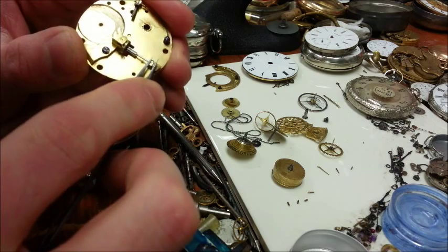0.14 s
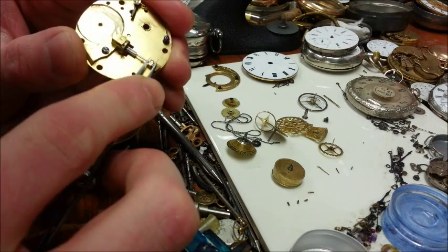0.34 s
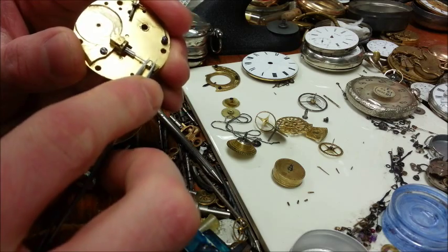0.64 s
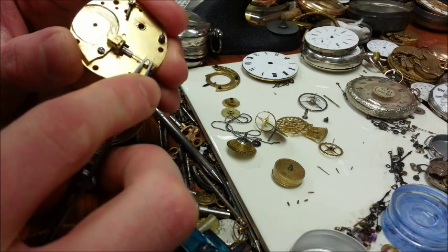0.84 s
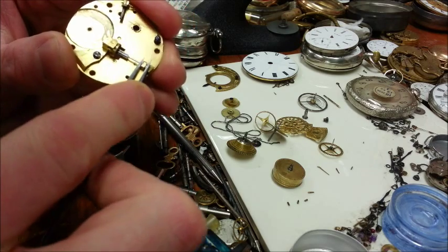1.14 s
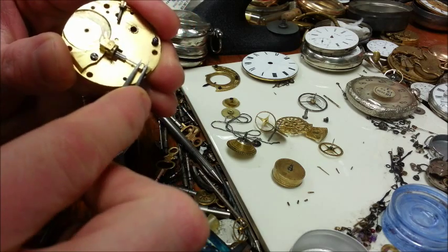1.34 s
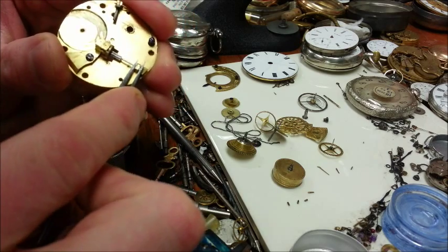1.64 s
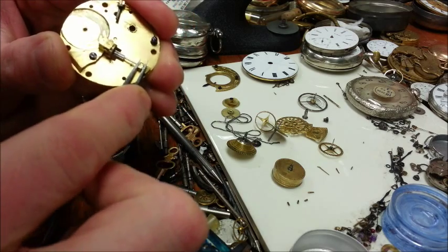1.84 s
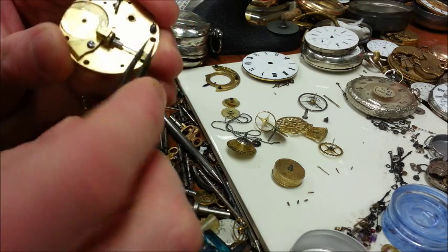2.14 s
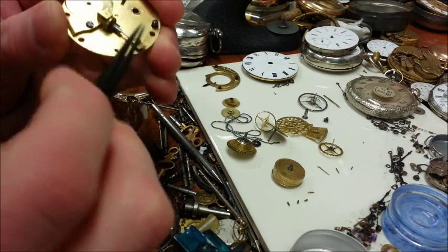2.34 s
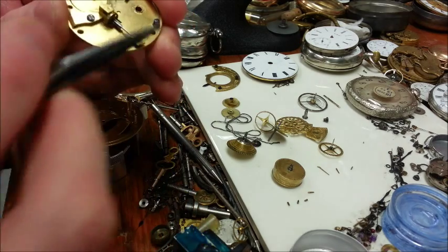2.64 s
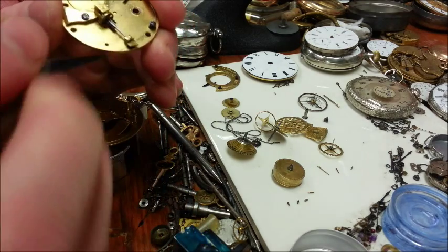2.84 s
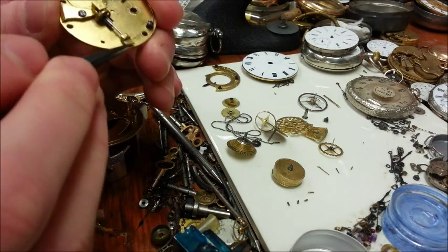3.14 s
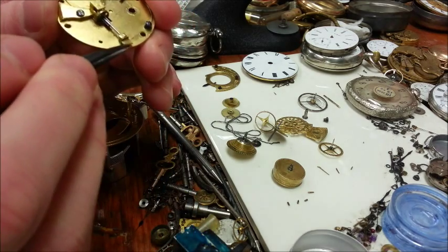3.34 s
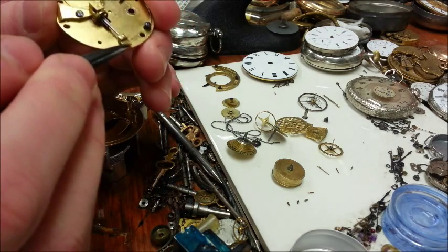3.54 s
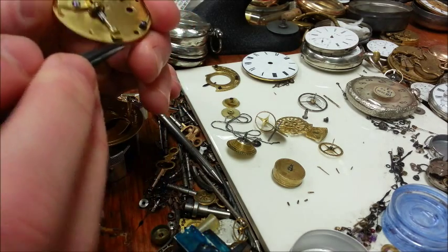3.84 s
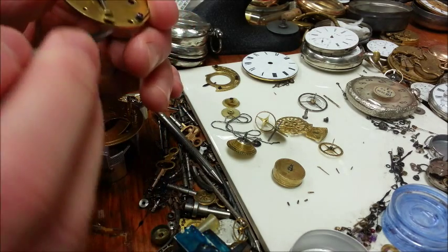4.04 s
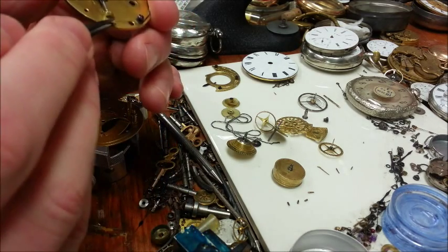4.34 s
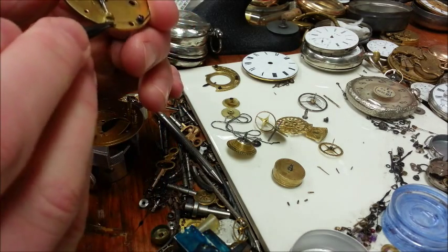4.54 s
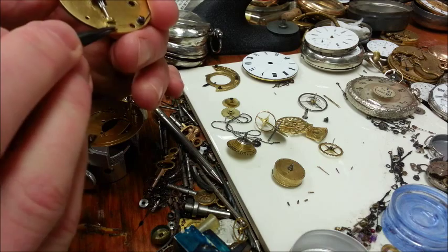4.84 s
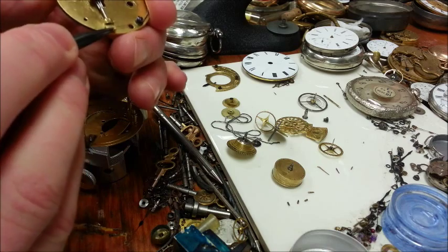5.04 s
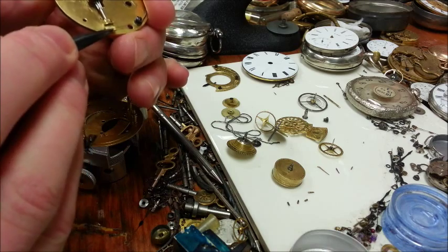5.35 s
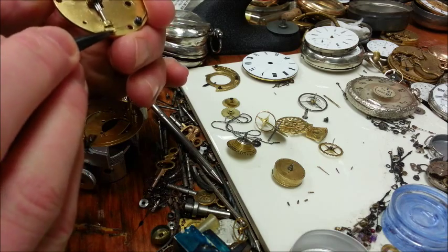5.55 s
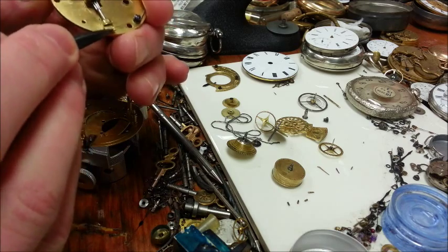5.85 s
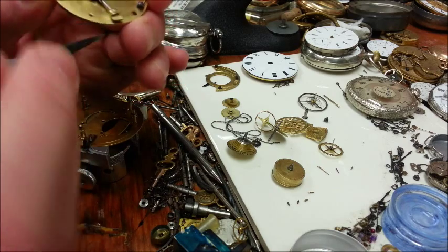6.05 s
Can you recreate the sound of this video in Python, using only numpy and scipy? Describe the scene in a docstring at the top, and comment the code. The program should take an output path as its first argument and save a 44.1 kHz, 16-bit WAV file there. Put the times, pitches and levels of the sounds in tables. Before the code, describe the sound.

A watch ticks faintly throughout, five times a second, with weak and strong beats alternating. Beneath it lie a steady low hum and rumble, slight hiss and a barely audible high whine. Close by on the right, steel tweezers tap a small brass watch movement at about 0.5 seconds, and give a quick cluster of lighter taps just after 2 seconds. From 2.6 to 3.3 seconds the tool knocks and rubs softly in the fingers. Tiny scratches and pinging taps follow between 3.7 and 4.4 seconds, ending in a duller, hollow knock and rub. At 5.2 seconds the tips slip off a part and snap shut with a sharp, briefly ringing click, by far the loudest sound. A second, softer snap comes at about 6 seconds. The small room adds only a very short echo to each click.

```python
"""Tweezers on a ticking watch

Steel tweezers work on a small brass watch movement, close by on the right. The tips tap, scratch
and twice snap off a part, making the metal ring. The tool knocks and rubs in the fingers, and a
watch ticks five times a second. A small room answers each click, over low hum, a thin whine and hiss."""
import sys
import numpy as np
from scipy import signal
from scipy.fft import rfft, irfft
from scipy.io import wavfile
from scipy.ndimage import uniform_filter1d

SR = 44100
rng = np.random.default_rng(int(sys.argv[2]) if len(sys.argv) > 2 else 0)


def master(y):
    """Save y as 16-bit WAV."""
    cut = np.clip(np.atleast_2d(y).T, -1, 1)
    pcm = np.round(cut * 32767)  # scale
    wavfile.write(sys.argv[1], SR, pcm.astype(np.int16))


N = 272538
T = np.arange(N) / SR

# The tips snap off a part:
# start_s, level_db, pitch_ratio, ring_time_ratio, slip_s, hollow_db, zing_db, low_tones_db, hiss_db
# hollow_db, zing_db and hiss_db are relative to level_db; low_tones_db softens the steel's lower tones.
SNAPS = [(5.2157, 5.8, 1.0, 1, .0016, -18.5, -20, 0, -24),
         (6.0638, -9.5, .967, 1.55, .003, -21, -8, -5.5, -18)]
# Tones of the hollow of the hand: pitch_hz, level_db, ring_s (time to fade by 60 dB)
HAND_TONES = [(1250, -9, .007), (1540, -7, .007), (1990, 0, .009), (2330, -5, .006)]
# The fine crack of small steel points: pitch_hz, level_db
FINE_CRACK = [(1000, -9), (2500, -8), (3800, -5.5), (5800, 0), (8000, 1.5), (11000, .5), (14500, -4.5),
              (16000, -30)]


def snaps():
    """The springy tips slip off and clap shut, ringing the steel; a tight grip mutes its low tones."""
    # Tones of the tweezers, and the zing of their very points: pitch_hz, level_db, ring_s
    steel_tones = [(3400, -24, .003), (4760, -16, .012), (5185, -2, .013), (5950, -15, .008),
                   (6750, -2.5, .007), (7790, -0.5, .0125), (8400, -17, .005), (10920, -9, .010),
                   (12100, -21, .005), (13600, -13, .008)]
    zing_tones = [(14380, 0, .018)]
    # The bare crack of hard contact: pitch_hz, level_db
    hard_crack = [(500, -27), (1200, -10), (2500, -1), (4000, 0), (7000, 6), (9000, 0), (14500, -5)]
    # Echoes from nearby surfaces: delay_s, level_db
    echoes = [(.0105, -26), (.028, -29)]
    out, low_below_hz = np.zeros(N), 5500
    for start_s, db, pitch, sustain, slip_s, hollow_db, zing_db, low_db, _ in SNAPS:
        tones = [(hz, level + low_db * (hz < low_below_hz), ring_s) for hz, level, ring_s in steel_tones]
        clap = blow(ring(tones, pitch, sustain), slip_s, chatter=.2, crack_db=-14, tone=hard_crack)
        add(out, start_s, undb(db + zing_db) * ring(zing_tones))
        add(out, start_s, undb(db) * clap)
        add(out, start_s, undb(db + hollow_db) * unit(ring(HAND_TONES) + .5 * thud()))
        for delay_s, echo_db in echoes:
            add(out, start_s + delay_s, undb(db + echo_db) * clap)
    return out


def tips():
    """Light touches rattle on the brass, ping and thud into the fingers; scratches make the brass sing."""
    # Tones of the brass movement: pitch_hz, level_db, ring_s
    brass_tones = [(4200, -16, .018), (5400, -20, .005), (6870, 0, .009), (7700, -12, .004),
                   (8600, -16, .004), (10400, -6, .005), (11150, -8, .004), (13400, -14, .004),
                   (14300, -17, .004)]
    # Each tap pings at two pitches, set by where it lands:
    # start_s, rattle_db, contact_s, low_hz, low_db, high_hz, high_db, thud_db
    taps = [(0.469, -15.5, .0052, 4400, -33, 7800, -22, -31),
            (0.4712, -21, .0038, 5500, -30, 10900, -29, -37),
            (2.151, -25, .0017, 6100, -27.5, 8600, -27, -43),
            (2.166, -24, .0025, 5900, -25.5, 7250, -23.5, -40),
            (2.1681, -28, .003, 4300, -33, 13200, -27, -45),
            (3.7295, -26, .003, 4200, -25, 10400, -26, -38), (3.958, -35, .001, 4350, -38, 7000, -36, -45),
            (4.131, -39, .001, 6100, -43, 7100, -41, -50), (4.357, -28, .0044, 4450, -38, 7900, -34, -45)]
    # The tips scrape along the brass: middle_s, length_s, level_db
    scratches = [(2.144, .041, -66), (3.672, .01, -61), (3.686, .013, -41), (3.704, .022, -57.5),
                 (3.723, .018, -43.5), (3.883, .025, -61.5), (3.957, .026, -59.5)]
    out = np.zeros(N)
    touched = ring(brass_tones, pitch=1.15, sustain=.25, flip=True)
    for start_s, db, contact_s, low_hz, low_db, high_hz, high_db, thud_db in taps:
        rattle = blow(touched, contact_s, chatter=1.4, crack_db=3, tone=FINE_CRACK)
        add(out, start_s, undb(db) * rattle)
        add(out, start_s, undb(thud_db) * thud())
        for hz, ping_db in (low_hz, low_db), (high_hz, high_db):
            add(out, start_s + contact_s / 4, undb(ping_db) * ring([(hz, 0, .017)]))  # rings for 17 ms
    brass = ring(brass_tones, flip=True)
    for middle_s, length_s, db in scratches:
        scratch = slide(brass, length_s, grain_db=4, crack_db=-1.5, tone=FINE_CRACK)
        add(out, middle_s - length_s * 3 / 4, undb(db) * scratch)
    return out


def grip():
    """Dull knocks and rubbing as the fingers take a new hold; sliding skin damps the tool further."""
    # Tones of the tool, damped by the fingers: pitch_hz, level_db, ring_s
    tool_tones = [(4350, -17, .006), (5600, 0, .005), (6250, -1, .005), (8000, -22, .003)]
    # The tool shifts: start_s, level_db, pitch_ratio, hollow_db, hollow_pitch_ratio, crack_db, thud_db
    knocks = [(2.5995, -23.5, 1.18, 0, 1.6, -6, -21), (2.6052, -27, 1.1, -10, 1.1, 0, -34),
              (2.6580, -28, 1.25, -5, 1.95, -2, -35), (2.8568, -33, 1.1, -3, 1.4, -2, -40),
              (3.1130, -34, 1.1, -12, 1, 2, -47), (3.1212, -28, 1.1, -12, 1.2, 3, -38),
              (3.1403, -33, 1.1, -12, 1, 2, -47), (3.1446, -32, 1.1, -12, 1, 2, -47),
              (4.4218, -17.5, 1, -7.5, 1, -22, -30), (4.4398, -23, 1, 8, .97, -12, -30),
              (4.4432, -29, 1.04, -8, 1.05, -8, -38)]
    # Skin slides over the tool: middle_s, length_s, level_db, hollow_db
    rubs = [(2.612, 0.036, -53, -14), (2.657, 0.04, -50, -12), (2.719, 0.12, -63.5, -1),
            (2.871, 0.05, -59, -9), (3.137, 0.05, -57, -20), (3.267, 0.031, -65, -1),
            (4.43, 0.029, -54.5, 9), (4.449, 0.056, -57, 10)]
    # The dry rasp of skin on steel: pitch_hz, level_db
    rasp = [(500, -10), (1300, 1), (2200, -4), (3300, -2), (4300, 0), (5500, .5), (7400, 2), (9300, -1.5),
            (14500, -3.5)]
    out = np.zeros(N)
    for start_s, db, pitch, hollow_db, hollow_pitch, crack_db, thud_db in knocks:
        hollow = ring(HAND_TONES, hollow_pitch, sustain=1 / hollow_pitch, flip=True)
        body = ring(tool_tones, pitch, flip=True) + undb(hollow_db) * hollow
        knock = blow(body, contact_s=.001, chatter=.25, crack_db=crack_db, tone=rasp)
        add(out, start_s, undb(db) * knock)
        add(out, start_s, undb(thud_db) * thud())
    muted = ring(tool_tones, pitch=1.25, sustain=.21, flip=True)
    hollow = ring(HAND_TONES, flip=True)
    for middle_s, length_s, db, hollow_db in rubs:
        rub = slide(muted + undb(hollow_db) * hollow, length_s, grain_db=6, crack_db=7, tone=rasp)
        add(out, middle_s - length_s * 3 / 4, undb(db) * rub)
    return out


def thud(size=2048):
    """The fingers soak up a blow: a short, dull knock with no pitch."""
    # The thud's tone: pitch_hz, level_db
    dull_tone = [(400, -14), (900, -4), (1400, 0), (2600, -1), (4000, -5), (5500, -20), (14500, -40)]
    return unit(colour(rng.standard_normal(size), dull_tone) * fade(T[:size], ring_s=.009))


def watch():
    """The escapement, the part that keeps the beat, rattles in its case, weak and strong in turn."""
    # Tones of the watch case: pitch_hz, level_db, ring_s
    case_tones = [(5800, -11, .004), (6600, -7, .004), (7350, 0, .007), (8650, -3, .005), (10200, -4, .004),
                  (11550, -2, .005), (13400, -8, .003)]
    # How loud a strong tick is as the hands move: time_s, level_db
    tick_levels = [(0, -32.5), (1.5, -34), (2.6, -32), (4.4, -33), (5.3, -36), (6.18, -36.5)]
    first_beat_s, beat_s, weak_db, scatter_db = .1667, .20011, -6, 1.2
    out, case = np.zeros(N), ring(case_tones, flip=True)
    for beat, start_s in enumerate(np.arange(first_beat_s, N / SR, beat_s)):
        db = np.interp(start_s, *np.transpose(tick_levels)) + weak_db * (beat % 2 == 0)
        db += scatter_db * rng.standard_normal()
        tick = blow(case, contact_s=.004, chatter=2.5, crack_db=3, tone=FINE_CRACK)
        add(out, start_s, undb(db) * tick)
    return out


def ring(tones, pitch=1, sustain=1, flip=False, size=2048):
    """A struck body's tones swell and fade; pitch scales their pitches and sustain their ring times."""
    t, sound = T[:size], 0
    for k, (hz, db, ring_s) in enumerate(tones):
        envelope = (1 - np.exp(-t * hz)) * fade(t, ring_s * sustain)
        sign = (-1) ** (k * flip)  # heard from the far end, every other tone is upside down
        sound = sound + sign * undb(db) * envelope * np.sin(2 * np.pi * hz * pitch * t)
    return unit(sound)


def blow(body, contact_s, chatter, crack_db, tone, size=1024):
    """One sharp push and a dying chatter sound through a body; the contact itself cracks."""
    rattle, crack = rng.standard_normal((2, size)) * np.exp(-(T[:size] / contact_s) ** 2)
    push = chatter * unit(rattle)
    push[0] += 1
    sound = unit(signal.fftconvolve(push, body))
    sound[:size] += undb(crack_db) * unit(colour(crack, tone))
    return unit(sound)


def slide(body, length_s, grain_db, crack_db, tone):
    """Surfaces catch and slip, swelling and fading over 1.5 x length_s, heard bare and through a body."""
    noise, unevenness = rng.standard_normal((2, SR // 2))
    size = min(int(1.5 * length_s * SR), SR // 2)
    catches = (noise * undb(grain_db * unevenness))[:size] * np.sqrt(np.hanning(size))
    sound = unit(signal.fftconvolve(catches, body))
    sound[:size] += undb(crack_db) * unit(colour(catches, tone))
    return unit(sound) * np.sqrt(size / 2)


def place(x, shadow, lag_s, walls_db, bench_db, walls_s, bench_s=.06, bent_share=.91):
    """Put a sound on the right: the left hears it later and duller; bench and walls echo it."""
    # The tone of the room's echo: pitch_hz, level_db
    room_tone = [(800, 0.5), (1400, 3), (2000, 2), (3000, 1.5), (5200, -2), (8000, -4), (10000, 0),
                 (14500, -3)]
    t = T[:SR // 2]
    bench, walls = rng.standard_normal((2, 2, len(t)))
    bench = unit(bench * (t > .002) * fade(t, bench_s))
    walls = unit(walls * (t > .007) * fade(t, walls_s))
    # Part of the sound bends round the fingers on its way left, which smears it.
    fingers = unit(rng.standard_normal(len(t)) * fade(t, ring_s=.012))
    left = np.interp(T - lag_s, T, colour(x, shadow))
    left = np.sqrt(1 - bent_share) * left + np.sqrt(bent_share) * signal.fftconvolve(left, fingers)[:N]
    echo = colour(undb(bench_db) * bench + undb(walls_db) * walls, room_tone)
    return np.array([left, x]) + signal.fftconvolve(x[None], echo, axes=1)[:, :N]


def bench_scatter():
    """Clutter on the bench scatters each snap into a short hiss on both sides."""
    # The scattered sound's tone: pitch_hz, level_db
    hiss_tone = [(600, -12), (1300, 0), (3500, 1), (6500, 1), (9000, -1), (14500, -5)]
    out, t = np.zeros((2, N)), T[:SR // 4]
    for start_s, db, *_, hiss_db in SNAPS:
        for side in out:
            hiss = colour(rng.standard_normal(len(t)), hiss_tone) * fade(t, ring_s=.15)
            add(side, start_s, undb(db + hiss_db) * unit(hiss))
    return out


def workroom():
    """Rumble that booms at the room's own pitches, with steady hum, a thin whine and hiss."""
    # Room rumble and hiss: pitch_hz, level_db_per_hz
    air = [(15, -81), (28, -104), (45, -75), (190, -78), (270, -72.5), (420, -76.5), (600, -81),
           (1000, -92.5), (1500, -99), (2500, -106), (4000, -109), (7000, -109), (10000, -111),
           (15000, -113)]
    # Where the room booms: pitch_hz, width_hz, lift_db
    booms = [(73.6, 15, 11), (98.4, 8, 10.5), (120, 21.9, 7), (141.15, 8.2, 16), (162.4, 21.8, 6),
             (221, 12.8, 7.5), (252.8, 23.6, 5.5), (340, 16.5, 6)]
    # Rumble is alike on both sides, hiss is not: pitch_hz, side_minus_mid_db
    stereo_spread = [(30, -35), (60, -48), (110, -10.5), (200, -16), (380, -9.5), (700, -0.5), (1290, -4.5),
                     (15000, 0.5)]
    # Motor and mains hum: pitch_hz, level_db
    hum_tones = [(56, -53.7), (120.05, -55.7), (144.5, -64), (240, -65)]
    # The drifting pitch of an electrical whine: time_s, pitch_hz
    whine_path = [(0, 8930), (2.2, 8770), (4.7, 8720), (6.18, 9070)]
    hz = np.fft.rfftfreq(N, 1 / SR)
    boom_db = sum(lift * np.exp(-2 * ((hz - f) / width) ** 2) for f, width, lift in booms)
    spread = undb(on_log(stereo_spread, hz))
    gain = undb(on_log(air, hz) + boom_db) * np.sqrt(SR / 2 / (1 + spread ** 2))
    mid = irfft(rfft(rng.standard_normal(N)) * gain, N)
    side = irfft(rfft(rng.standard_normal(N)) * gain * spread, N)
    hum = np.sqrt(2) * sum(undb(db) * np.sin(2 * np.pi * (f * T + rng.random())) for f, db in hum_tones)
    waver_hz = 250 * uniform_filter1d(rng.standard_normal(N), size=100)
    whine_hz = np.interp(T, *np.transpose(whine_path)) + waver_hz
    whine = undb(-82.5) * np.sin(2 * np.pi * np.cumsum(whine_hz) / SR)
    lean_left_db = .6
    return np.array([undb(lean_left_db) * (mid + side), undb(-lean_left_db) * (mid - side)]) + hum + whine


def undb(db):
    """Turn decibels into a volume multiplier."""
    return 10 ** (np.asarray(db) / 20)


def fade(t, ring_s):
    """A fade that drops by 60 dB in ring_s seconds."""
    return np.exp(-np.log(1000) * t / ring_s)


def on_log(points, hz):
    """Read between (pitch_hz, value) points, with octaves evenly spaced."""
    pitches, values = np.transpose(points)
    return np.interp(np.log(hz + 1), np.log(pitches), values)


def colour(x, points):
    """Shape a sound's tone with a (pitch_hz, level_db) curve."""
    size = 2 * x.shape[-1]
    gain = undb(on_log(points, np.fft.rfftfreq(size, 1 / SR)))
    return irfft(rfft(x, size) * gain)[..., :size // 2]


def unit(x):
    """Scale a sound so its total energy is 1."""
    return x / np.sqrt(np.sum(x ** 2, axis=-1, keepdims=True))


def add(out, start_s, x):
    """Mix x into out, beginning at start_s."""
    i = max(int(start_s * SR), 0)
    out[i:i + len(x)] += x[:max(N - i, 0)]


def scene():
    """Tweezers and movement close by, the ticking watch a little further off, the room behind."""
    # The left side gets less treble, most of all from the snaps: pitch_hz, left_level_db
    shadow = [(1000, -1), (2500, -1), (3800, -1.5), (5400, -5), (7400, -12), (10000, -8), (14500, -8)]
    snap_shadow = [(1000, -1), (2500, -1), (3800, 0), (5200, -6.5), (6300, -10), (7600, -19), (10000, -11),
                   (14500, -11)]
    snap_lag_s, lag_s = .00023, .00043
    snapping = place(snaps(), snap_shadow, snap_lag_s, walls_db=-27, bench_db=-22, walls_s=.14,
                     bent_share=.1) + bench_scatter()
    touches = place(tips(), shadow, lag_s, walls_db=-18, bench_db=-11, walls_s=.22)
    handling = place(grip(), shadow, lag_s, walls_db=-16, bench_db=-12, walls_s=.18)
    ticking = place(watch(), shadow, lag_s, walls_db=-8.5, bench_db=1.5, walls_s=.36, bench_s=.12)
    return snapping + touches + handling + ticking + workroom()


def record(dry):
    """Cut away the very highest treble."""
    top_hz = 14650
    return signal.sosfilt(signal.ellip(10, .2, 70, top_hz, fs=SR, output="sos"), dry)


dry = scene()
out = record(dry)
master(out)
```